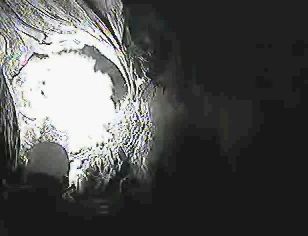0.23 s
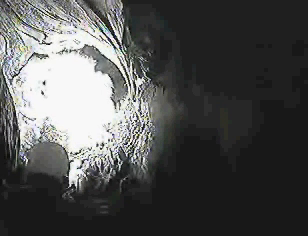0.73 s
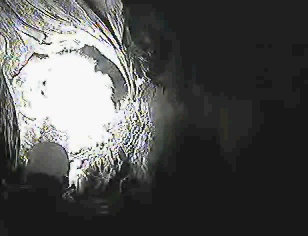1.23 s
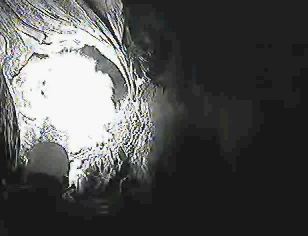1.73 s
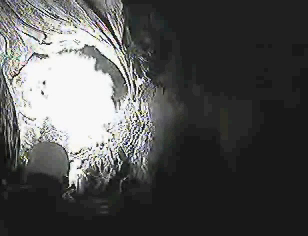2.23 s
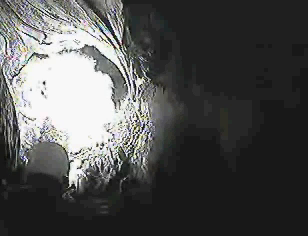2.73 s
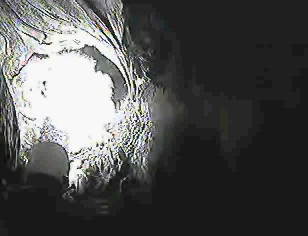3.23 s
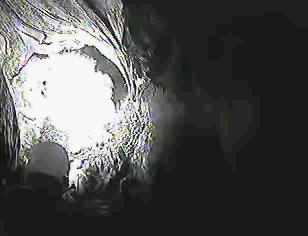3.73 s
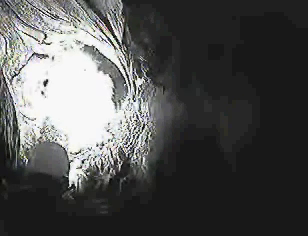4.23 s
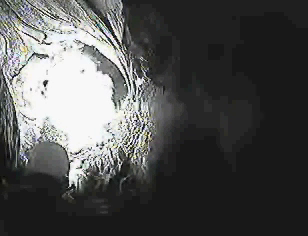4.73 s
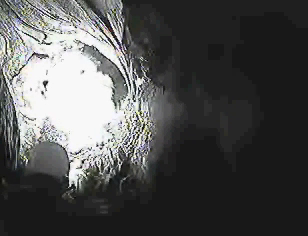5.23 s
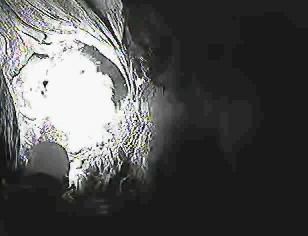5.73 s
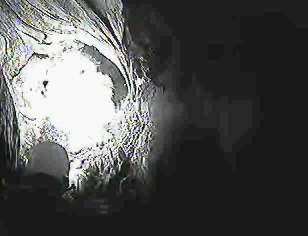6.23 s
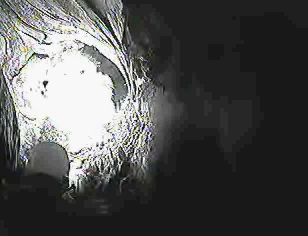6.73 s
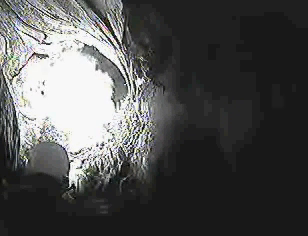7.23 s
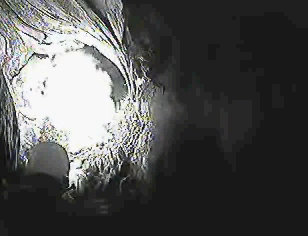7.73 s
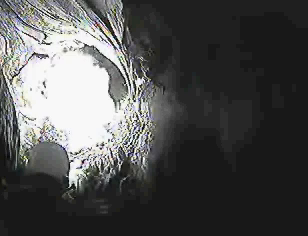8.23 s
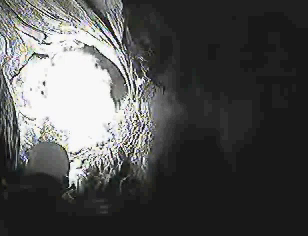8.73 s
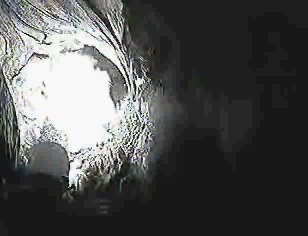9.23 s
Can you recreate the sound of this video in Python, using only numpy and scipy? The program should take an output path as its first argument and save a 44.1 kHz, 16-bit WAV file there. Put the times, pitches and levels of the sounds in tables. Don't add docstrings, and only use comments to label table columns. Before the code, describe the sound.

A young owl close by gives harsh, distorted hisses in a wooden box, seconds apart, over quiet night air with frogs and a cricket.

```python
import sys
import numpy as np
from scipy import signal
from scipy.fft import rfft, irfft, dct
from scipy.io import wavfile
from scipy.ndimage import uniform_filter1d, minimum_filter1d

SR = 44100
rng = np.random.default_rng(int(sys.argv[2]) if len(sys.argv) > 2 else 0)


def convert_level_to_amplitude(level_db):
    exponent = np.asarray(level_db, float) / 20
    return 10 ** exponent


def store_wav(level_fs):
    pcm = np.round(np.clip(np.atleast_2d(level_fs), -1, 1) * 32767)
    wavfile.write(sys.argv[1], SR, pcm.T.astype(np.int16))


N = 417627

# hz, level_db (per Hz)
HUSH_SPECTRUM = [(26, -47), (45, -10), (144, -12), (182, -7), (253, 1), (911, -5), (1120, -2.5), (2110, -3),
                 (2370, 1), (3360, -8), (4660, -10), (8160, -20.5), (9610, -24), (11800, -41.5),
                 (15400, -66), (22000, -120)]
# start_s, length_s, level_db, pitch_hz
FAR_FROGS = [(0.255, 0.3, -72, 2680), (0.819, .16, -69.5, 3120), (1.188, .04, -66.5, 2300),
             (1.353, 0.21, -70.5, 2620), (1.982, 0.18, -69, 3030), (2.609, 0.055, -59.5, 2360),
             (2.672, .1, -72.5, 2270), (3.063, 0.21, -72, 3100), (4.199, 0.13, -71, 3070),
             (5.045, 0.16, -79, 2630), (5.92, 0.23, -71, 3110), (6.33, 0.12, -69, 2650)]
# start_s, peak_db
NEAR_FROG_CALLS = [
    (.987, -53),
    (3.8636, -52),
    (6.8728, -52.5),
]
FROG_PULSES = [-7, -5, 1, 0, -7, -40, -34, -40, -40, 0.5, -1, -4]
CRICKET_CHIRPS = [.68, 1.23, 1.75, 2.82, 3.38, 4., 4.57, 5.8, 6.33, 6.9, 8.28]
# time_s, level_db, pitch_hz
SCREECH_WHISTLE = [(8.09, -86, 2250), (8.13, -66, 2240), (8.24, -67, 2300), (8.262, -64, 2020),
                   (8.59, -64, 1985), (8.82, -63.5, 1935), (9.0, -58.5, 1970), (9.36, -60.5, 1970),
                   (9.47, -66, 1885)]
# start_s, lift_db, lift_hz
SCREECH_JOLTS = [(8.264, 5, 170), (8.3, 1.5, 90), (8.384, 4.5, 110), (8.605, 10.5, 130), (8.729, 5, 110),
                 (9.101, 2, 110), (9.17, -3, 80), (9.33, 1.5, 40)]
# hz, level_db
SCREECH_BREATH = [(2000, -28), (2300, -1), (2900, -1.5), (3120, -22.5), (3950, -3), (4500, -9),
                  (5020, -26.5), (5500, -2.5), (5800, -2), (6150, -13), (6500, -23.5), (7500, -43.5)]
# start_s, end_s, top_db (over the overload point), widest_share (of the hiss), sigh_db (after it)
HISSES = [
    (-.37, .1, 10, 0.8, -24),
    (2.124, 2.595, 10, 0.8, -35),
    (5.196, 5.673, 9.5, .8, -23.5),
    (7.31, 7.782, 10.5, 0.85, -24),
]
# pitch_hz, width_hz, narrow_beak_db, wide_beak_db
THROAT = [(1273, 440, -13.5, -22), (2646, 330, -12, -24), (3306, 280, -17, -3.5), (3887, 370, -8.5, -3.5),
          (4570, 312, -2.5, -0.5), (5317, 385, -1.5, -1.5), (6070, 360, -5, -7.5), (6730, 370, -15, -13),
          (7374, 420, -9.5, -10.5), (8317, 610, -14, -12), (8860, 730, -10.5, -22.5),
          (10000, 420, -18, -19.5)]
# time_s, level_db, length_ms
POPS_OPEN = [
    (2.124, -9, 4.6),
    (5.194, -5.5, 2.6),
    (7.3072, -9, 3.5),
]
# time_s, level_db, length_ms
POPS_SHUT = [(2.596, 1.5, 3.4), (2.5993, 2.5, 3.2), (2.609, 3.5, 1.6), (2.6259, 1.5, 11), (5.6739, 2, 2.6),
             (5.6776, 8, 2.3)]
POP_OVERTONES = [-23, -1.5, -7.5, -10.5]
# start_s, level_db, length_s
PUFFS = [
    (0.081, -8, 0.043),
    (2.587, -6.5, 0.035),
    (5.664, -12, 0.026),
    (7.747, -12.5, 0.095),
]
# hz, t60_s
BOX_DECAY = [(500, 0.14), (2000, 0.75), (4000, 0.28), (7000, 0.36), (11000, 0.067)]
# pitch_hz, width_hz, depth_share
LINE_NOTCHES = [(3070, 360, 0.3), (4950, 270, 0.4), (7000, 250, 0.4), (7570, 140, 0.6)]
# hz, level_db
LINE_COLOUR = [(15, -8.5), (70, -6), (150, -1), (350, 6), (500, -0.5), (720, -7), (1200, -1.5), (3000, -1),
               (8500, 0), (9800, -6), (11000, -14.5), (12200, -28), (13000, -62.5)]
# hz, step_db
ROUNDING_STEP = [(100, -40), (1000, -24), (3000, -9), (5000, -4), (6200, -1), (7500, -.5), (8800, -2.5),
                 (10000, -7), (11500, -20), (12400, -34)]

OVERLOAD_DB = -32


def evened(x):
    return x / np.sqrt(np.mean(x ** 2) + 1e-20)


def wander(count, size):
    return evened(uniform_filter1d(rng.standard_normal(count), size=size))


def read(points, hz):
    f, value = np.transpose(points)
    return np.interp(np.log(hz + 1), np.log(f + 1), value)


def add(mix, s, sound):
    part = mix[round(s * SR):][:len(sound)]
    part += sound[:len(part)]


def colour(x, points):
    size = 2 ** 14
    gain = convert_level_to_amplitude(read(points, np.fft.rfftfreq(size, 1 / SR)))
    cepstrum = irfft(np.log(gain), size)
    cepstrum[1:size // 2] *= 2
    taps = irfft(np.exp(rfft(cepstrum[:size // 2], size)), size)[:size // 2]
    return signal.oaconvolve(x, taps)[:len(x)]


def resonate(x, hz, width):
    turn = np.exp(2j * np.pi * np.cumsum(hz * np.ones(len(x))) / SR)
    r = np.exp(-np.pi * width / SR)
    smooth = signal.lfilter([(1 - r) ** 2], [1, -2 * r, r * r], x / turn + 1e-18)
    return 2 * (turn * smooth).real


def notched(x, undo=False):
    for hz, width, depth in LINE_NOTCHES:
        b, a = signal.iirpeak(hz, hz / width, SR)
        dip = a - depth * b
        x = signal.lfilter(a, dip, x) if undo else signal.lfilter(dip, a, x)
    return x


def hush():
    frames, hz = N // 256 + 5, np.fft.rfftfreq(1024, 1 / SR)
    a, b, patches = rng.standard_normal((frames, 513, 3)).T
    patches = uniform_filter1d(patches, size=8, axis=0)
    patches = evened(uniform_filter1d(patches, size=16, axis=1))
    chorus = np.exp(-((hz - 2450) / 350) ** 2)[:, None]
    z = (a + 1j * b) * convert_level_to_amplitude(read(HUSH_SPECTRUM, hz)[:, None] + (1.0 + 0.6 * chorus) * patches)
    air = convert_level_to_amplitude(-64.5) * evened(signal.istft(z, nperseg=1024, noverlap=768)[1][:N])
    return notched(air, undo=True)


def trill(s, length, db, hz, per_s, width, fuzz):
    t = np.arange(0, length, 1 / SR)
    pulses = np.diff(np.floor(t * per_s + 1.2), prepend=0)
    drive = (1 - fuzz) * evened(pulses) + fuzz * rng.standard_normal(len(t))
    return s, convert_level_to_amplitude(db) * evened(resonate(drive, hz, width)) * signal.windows.tukey(len(t), .6)


def croak(s, db, hz):
    t = np.arange(0, .06, 1 / SR)
    pulse = np.sin(2 * np.pi * hz * t) * np.sin(np.pi * np.minimum(t / 0.0076, 1)) ** 2
    echo = evened(resonate(rng.standard_normal(len(t)), hz, 250))
    echo *= convert_level_to_amplitude(-12 - 290 * t) * np.minimum(t / 0.016, 1)
    return s, convert_level_to_amplitude(db) * (pulse + echo)


def screech():
    s, *columns = np.transpose(SCREECH_WHISTLE)
    t = np.arange(s[0], s[-1], 1 / SR)
    db, hz = (np.interp(t, s, c) for c in columns)
    rise_s, fall_s = .006, 0.054
    for at, jolt_db, jolt_hz in SCREECH_JOLTS:
        since = np.maximum(t - at, 0)
        jolt = np.minimum(since / rise_s, 1) * np.exp(-since / fall_s)
        db, hz = db + jolt_db * jolt, hz + jolt_hz * jolt

    waver_hz = 30 * wander(len(t), 600)
    clear = np.clip((t - 8.27) / .04, 0, .83)
    tone = np.sqrt(2) * np.sin(2 * np.pi * np.cumsum(hz + waver_hz) / SR)
    air = rng.standard_normal((4, len(t)))
    hoarse = evened(resonate(air[0], hz + 30, 240))
    whistle = clear * tone + np.sqrt(1 - clear ** 2) * hoarse

    top_s, top_db = 8.95, -61
    breath_db = top_db - ((t - top_s) / np.where(t < top_s, 0.18, 0.22)) ** 2
    ridges = convert_level_to_amplitude(-10) * evened(resonate(air[2], 1.99 * hz, 250))
    ridges += convert_level_to_amplitude(-8) * evened(resonate(air[3], 2.93 * hz, 300))
    breath = evened(colour(air[1], SCREECH_BREATH)) + ridges
    breath *= convert_level_to_amplitude(breath_db) * np.minimum((t - s[0]) / .2, 1)
    return s[0], convert_level_to_amplitude(db) * whistle + breath


def night():
    out = hush()
    pulse_gap_s, first_hz, rise_hz = .0165, 2207, 13
    for s, db in NEAR_FROG_CALLS:
        for k, pulse_db in enumerate(FROG_PULSES):
            add(out, *croak(s + k * pulse_gap_s, db + pulse_db, first_hz + k * rise_hz))
    for row in FAR_FROGS:
        add(out, *trill(*row, per_s=45, width=180, fuzz=.8))
    for s in CRICKET_CHIRPS:
        add(out, *trill(s, length=.16, db=-76.5, hz=4570, per_s=31, width=110, fuzz=0.6))
    add(out, *screech())
    return colour(out, [(f, -max(db, -30)) for f, db in LINE_COLOUR])


def box(x):
    taps = np.zeros(SR // 2)
    at = np.arange(100, len(taps) - 20, 20)
    at = at + rng.integers(0, 20, len(at))
    taps[at] = rng.choice([-1., 1.], len(at))
    hz, t, z = signal.stft(taps, SR, nperseg=256)
    decay = convert_level_to_amplitude(-60 * t / read(BOX_DECAY, hz)[:, None])
    tail = signal.istft(z * decay, SR, nperseg=256)[1]
    return signal.fftconvolve(x, tail / np.linalg.norm(tail))[:N]


def pop(s, db, ms, overtones):
    u = np.linspace(-1, 1, int(ms * SR / 1000))
    phase = 2 * np.pi * np.cumsum(1225 * (1 - 0.07 * u)) / SR
    upper = sum(convert_level_to_amplitude(d) * np.sin((k + 2) * phase) for k, d in enumerate(POP_OVERTONES))
    wave = (1 - overtones) * np.cos(phase) + overtones * upper
    return s - ms / 2000, convert_level_to_amplitude(db) * wave * np.hanning(len(u))


def hiss(start, end, top_db, widest, sigh_db):
    length = end - start
    sigh_s = .075
    attack_s, settle_s = .026, 0.084
    t = np.arange(0, length + sigh_s, 1 / SR)
    effort_s = [0, 0.0097, attack_s, settle_s, .62 * length, length - .035, length - .003, length, length + sigh_s]
    effort_db = top_db + np.interp(t, effort_s, [-42, -18, -1.5, -5, 0, -1, -7, sigh_db, sigh_db - 20])
    wide = np.interp(t, [attack_s, settle_s, widest * length, length], [0, .22, 1, .75])

    air = rng.standard_normal(len(t))
    flutter_db = 1.7 * wander(len(t), 300) + 1.2 * wander(len(t), 1500)
    drift = 1 + .03 * (.6 - wide) + .018 * wander(len(t), 3000)
    throat = np.zeros(len(t))
    for k, (hz, width, narrow_db, wide_db) in enumerate(THROAT):
        gain = convert_level_to_amplitude(narrow_db + (wide_db - narrow_db) * wide)
        band = resonate(air, hz * drift, 1.7 * width) / np.sqrt(width)
        throat += (-1) ** k * gain * band
    sound = convert_level_to_amplitude(effort_db + flutter_db) * evened(throat)
    return max(start, 0), sound[t + start >= 0]


def chick():
    close = np.zeros(N)
    for row in HISSES:
        add(close, *hiss(*row))
    for row in POPS_OPEN:
        add(close, *pop(*row, overtones=.27))
    for row in POPS_SHUT:
        add(close, *pop(*row, overtones=0.75))
    for s, db, length in PUFFS:
        add(close, s, convert_level_to_amplitude(db) * np.hanning(int(length * SR)))
    return convert_level_to_amplitude(OVERLOAD_DB) * (close + convert_level_to_amplitude(-29.5) * box(close))


def scene():
    return (chick() + night())[None]


def overload(x):
    lean, hard = -0.14, 2.25

    def flat(v):
        return v / (1 + abs(v) ** hard) ** (1 / hard)

    return convert_level_to_amplitude(OVERLOAD_DB) * (flat(x / convert_level_to_amplitude(OVERLOAD_DB) + lean) - flat(lean))


def recorder_rounding(x):
    hop, first = 2822, 1370
    lead = 2 * hop - first
    padded = np.concatenate([np.zeros(lead), x, np.zeros(3 * hop)])
    count = len(padded) // hop - 1
    window = np.sin(np.pi * (np.arange(2 * hop) + .5) / (2 * hop))
    frames = padded[np.arange(count)[:, None] * hop + np.arange(2 * hop)] * window
    a, b, c, d = np.split(frames, 4, axis=1)
    z = dct(np.hstack([-c[:, ::-1] - d, a - b[:, ::-1]]), type=4, norm="ortho")

    hz = np.arange(hop) * SR / (2 * hop)
    middle = z[:, (hz > 1000) & (hz < 10000)]
    level = np.sqrt(np.mean(middle ** 2, axis=1, keepdims=True)) + 1e-9
    chance_db = 1.9 * rng.standard_normal((count, 40))[:, (np.sqrt(hz) / 4).astype(int)]
    step = level * convert_level_to_amplitude(read(ROUNDING_STEP, hz) + chance_db)
    near = np.sqrt(abs(uniform_filter1d(z ** 2, size=80, axis=1))) + 1e-10
    step = np.minimum(step, 5.3 * near)

    p, q = np.split(dct(np.round(z / step) * step - z, type=4, norm="ortho"), 2, axis=1)
    parts = np.hstack([q, -q[:, ::-1], -p[:, ::-1], -p]) * window
    error = (parts[1:, :hop] + parts[:-1, hop:]).ravel()[lead - hop:][:N]
    power = -abs(uniform_filter1d(x ** 2, size=200))
    past = minimum_filter1d(power, size=hop, origin=hop // 2 - 1)
    ahead = minimum_filter1d(power, size=2 * hop)
    return x + error * np.minimum(np.sqrt(6.5 * past / (ahead - 1e-14)), 1)


def roll_off(x):
    return signal.sosfilt(signal.butter(12, 12400, fs=SR, output="sos"), x)


def record(dry):
    clipped = overload(dry[0])
    r = np.exp(-2 * np.pi * 17.0 / SR)
    coupled = signal.lfilter([1, -1], [1, -r], clipped)
    line = colour(notched(coupled), LINE_COLOUR)
    grain = colour(rng.standard_normal(N), [(6000, -87), (10000, -95), (12000, -108)])
    offset = -0.0029
    mix = recorder_rounding(line) + grain + offset
    return roll_off(mix[None])


dry = scene()
out = record(dry)
store_wav(out)
```